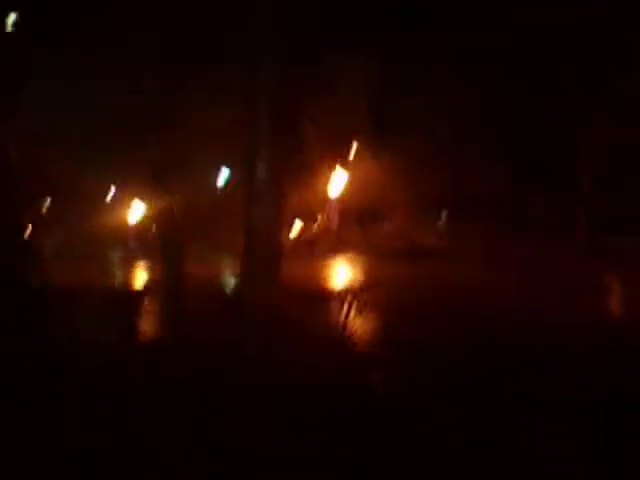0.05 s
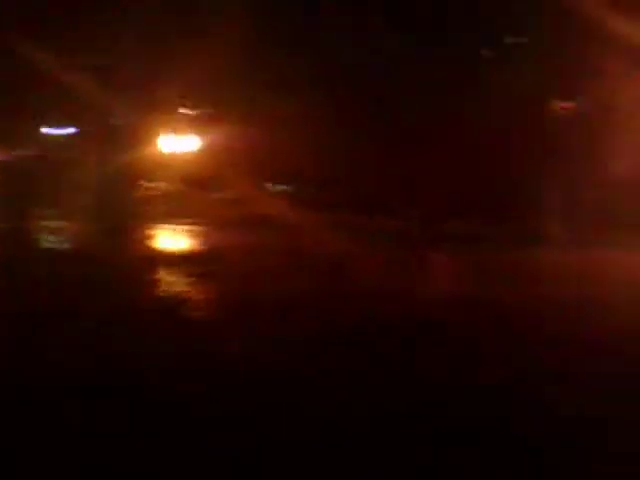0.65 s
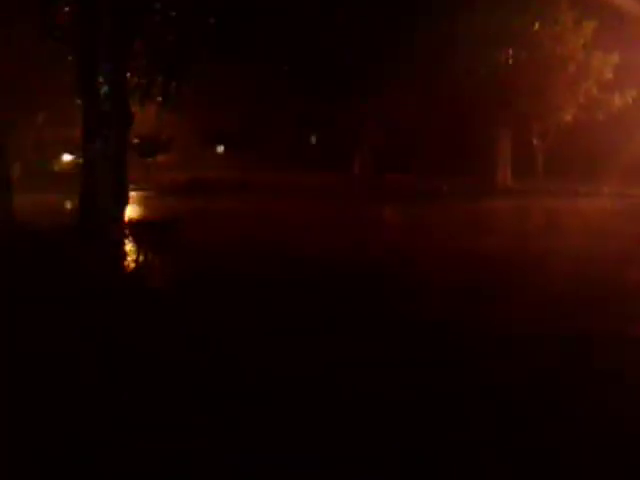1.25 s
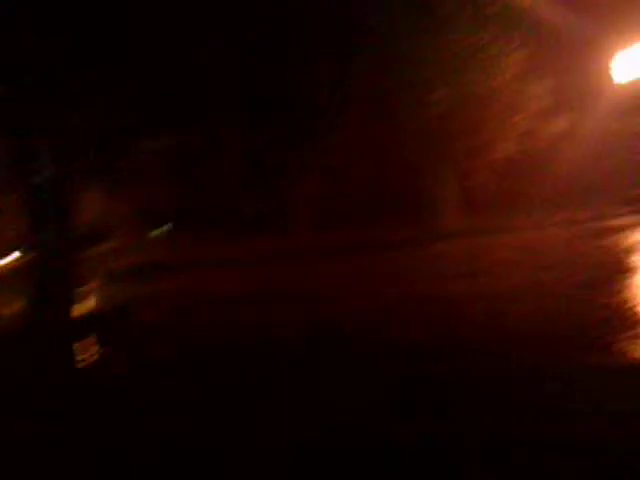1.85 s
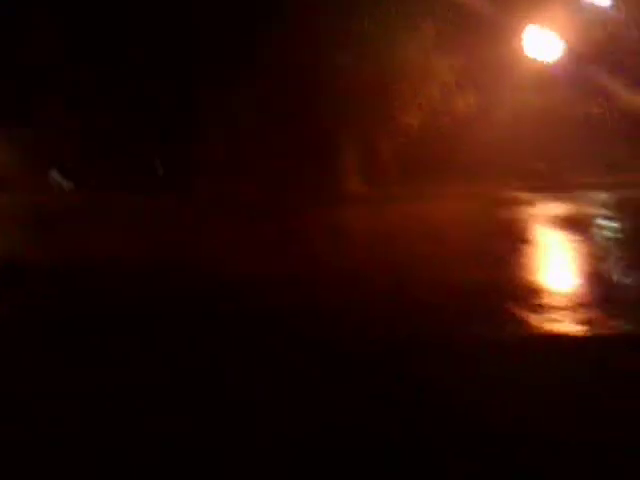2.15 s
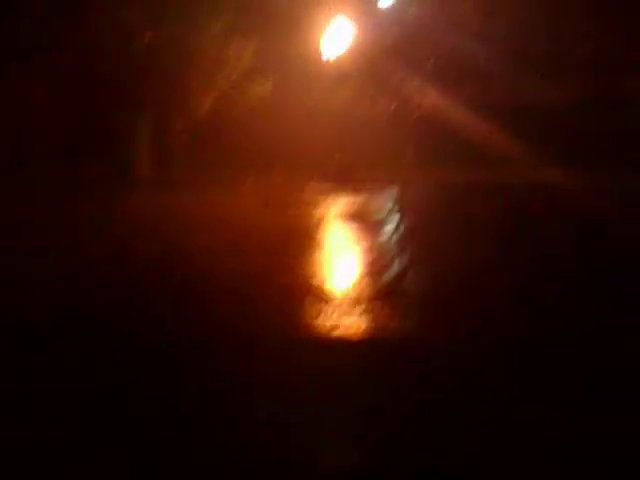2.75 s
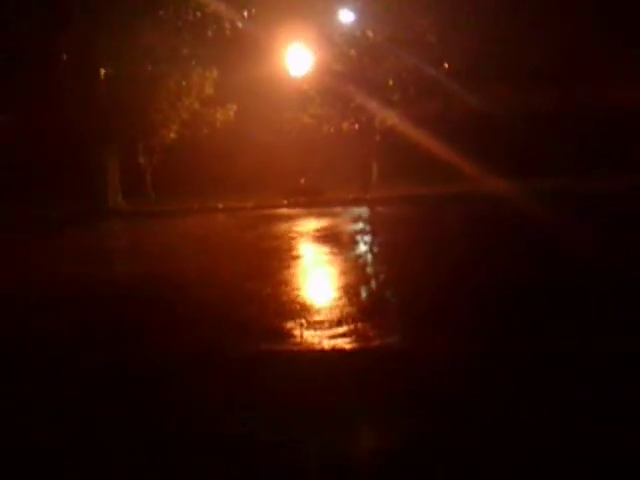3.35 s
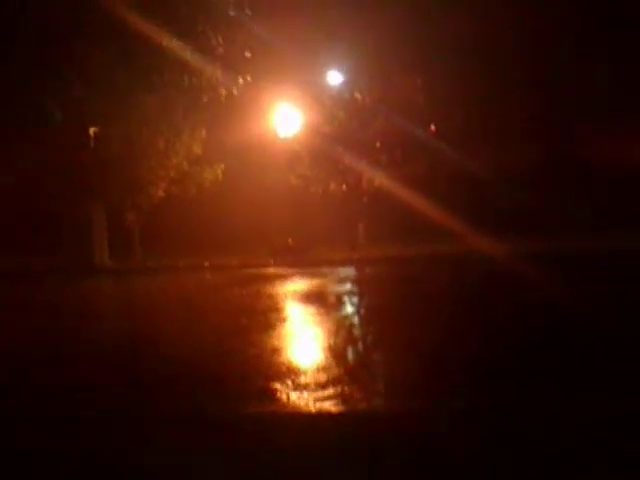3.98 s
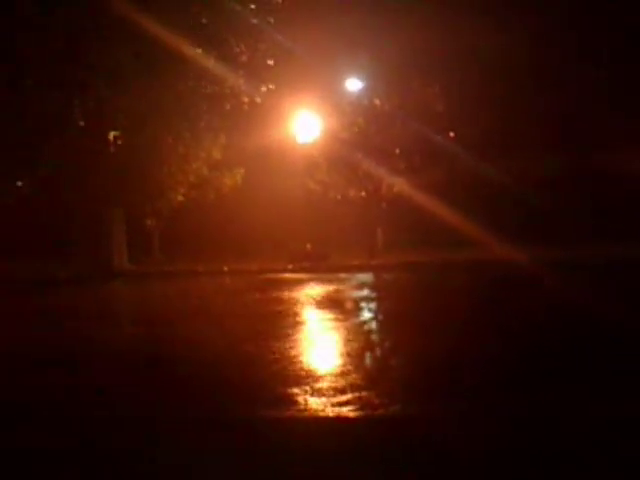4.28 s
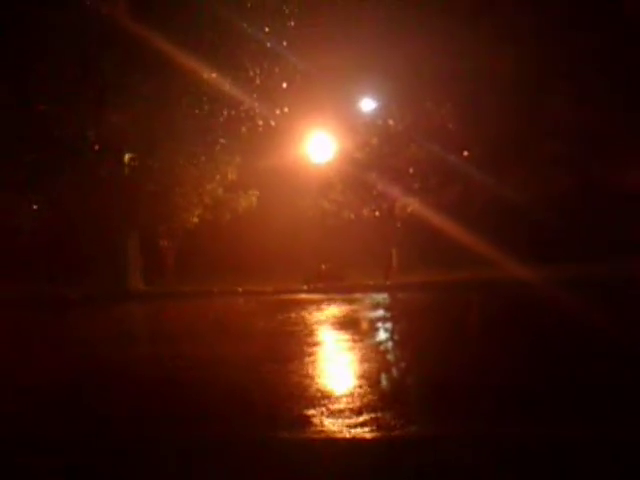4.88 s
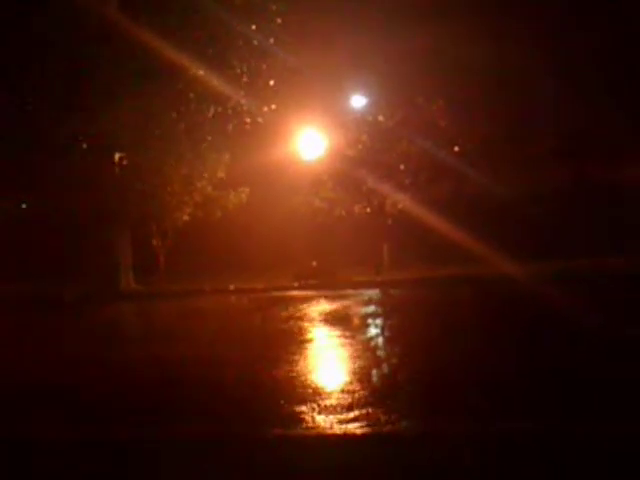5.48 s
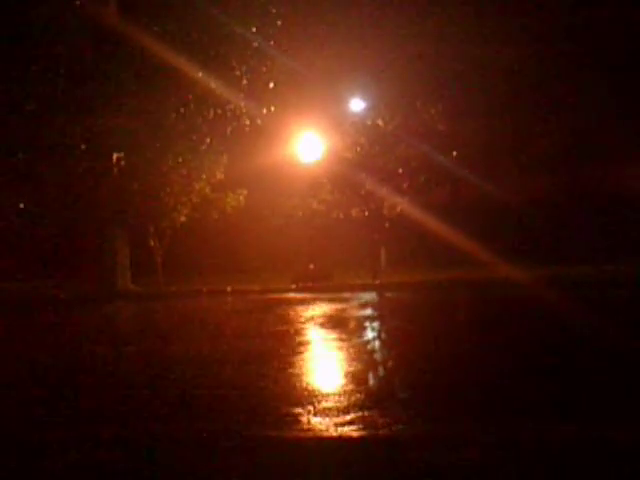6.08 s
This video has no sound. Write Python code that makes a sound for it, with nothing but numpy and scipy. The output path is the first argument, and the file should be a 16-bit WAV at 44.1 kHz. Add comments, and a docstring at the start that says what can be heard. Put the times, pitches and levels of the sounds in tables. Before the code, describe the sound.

A car drives along a wet street in the rain, heard from one sheltered spot for about six seconds. In the first 0.3 seconds the engine rises briefly and drops with a change up in gear. It then gains speed very slowly, its low tones swelling one after another and blending with a steady road rumble, rolling like low thunder. The tyres roar and throw up a soft hiss of spray, growing louder around 3.5 seconds and again near 6 seconds, over a very faint, thin whine. Fine rain patters lightly throughout, and single drops tick irregularly on surfaces close by, most clearly at about 2.3, 2.8, 4.1 and 5.7 seconds. A deep, dull thud comes at about 4.2 seconds and a softer one near 4.9 seconds. The drive continues to the end.

```python
"""On a wet street at night, a car drives through the rain. Just after a change up in gear,
the engine slowly gains speed. Its tones boom one after another and, with the rumble of
the road, roll like low thunder. The tyres roar and throw up hissing spray, louder as
the drive goes on, over a faint whine. Raindrops tick on surfaces close by."""
import sys
import numpy as np
from scipy import signal
from scipy.fft import rfft, irfft, next_fast_len
from scipy.io import wavfile
from scipy.ndimage import uniform_filter1d, map_coordinates

SR = 44100
rng = np.random.default_rng(int(sys.argv[2]) if len(sys.argv) > 2 else 0)


def int16_out(signal):
    """Quantize to a 16-bit WAV file."""
    q = np.round(np.clip(np.atleast_2d(signal).T, -1, 1) * 32767)
    wavfile.write(sys.argv[1], SR, q.astype(np.int16))


N = 274704


def amp(db):
    """Turn decibels into a number to multiply by."""
    return 10 ** (np.asarray(db) / 20)


def unit(x):
    """Scale a sound to an average power of 1."""
    return x / np.sqrt(np.mean(x ** 2) + 1e-20)


def curve(rows):
    """Join (seconds, value) points with straight lines, one value per sample."""
    return np.interp(np.arange(N) / SR, *np.transpose(rows))


def wobble(rate):
    """A smooth random curve through `rate` points a second."""
    points = rng.standard_normal(int(N * rate / SR) + 4)
    coarse = np.arange(0, N, 64)
    return np.interp(np.arange(N), coarse, map_coordinates(points, [coarse * rate / SR]))


def filtered(x, response):
    """Multiply each frequency in a sound by response(hz)."""
    size = next_fast_len(N + SR // 2)
    return irfft(rfft(x, size) * response(np.fft.rfftfreq(size, 1 / SR)), size)[:N]


def noise(spectrum):
    """Noise of power 1, shaped by (Hz, dB) points."""
    points_hz, db = np.transpose(spectrum)
    white = rng.standard_normal(N)
    return unit(filtered(white, lambda hz: amp(np.interp(np.log(hz + 1), np.log(points_hz), db))))


def street_db(mean_db, growth):
    """A level around mean_db that gains `growth` dB for each dB the street noise gains."""
    # The street noise. Each row: time in seconds, level in dB (only its changes count).
    street = [(0, -52.8), (.3, -49), (1.2, -50), (1.6, -48), (3.1, -48.5), (3.7, -45.5), (4.4, -45),
              (5.65, -45), (5.95, -43.5), (6.23, -43.5)]
    level = curve(street)
    return mean_db + growth * (level - level.mean())


def engine(flutter_db=1.35, weak_flutter_db=3, drift_radians=0.73, boom_steepness=4.03):
    """The engine hums in orders: tones at whole multiples of its shaft's turning speed."""
    # How fast the engine fires. Each row: time in seconds, firings per second.
    firing_rates = [(0, 52), (.13, 55.5), (.25, 49.9), (.8, 50.35), (1.25, 51.1), (2, 51.85), (5.7, 55.8),
                    (5.95, 56.6), (6.23, 57)]
    # Strong orders boom near certain speeds. Each row: order, firings per second at the peak,
    # half width in firings per second, level in dB.
    booms = [(2, 51.95, 0.52, -32.5), (2, 56.3, 2.37, -30), (3, 52.6, 0.47, -30.5), (3, 54.1, .8, -33.5),
             (4, 50.5, 0.44, -27.5), (4, 52.25, 0.8, -30.5), (4, 54, 0.63, -36.5), (4, 56.8, .8, -41.5),
             (6, 50.6, .4, -35), (6, 51.55, .33, -29), (6, 52.3, 0.51, -36.5), (6, 54.6, 1.7, -35.5),
             (8, 49.85, .3, -32), (8, 51.4, 1.16, -41.5), (8, 53.0, .27, -35.5), (8, 54.25, .45, -37.5),
             (10, 51.0, 0.37, -44)]
    # Uneven firing adds weak orders that waver more. Each entry: an order.
    weak_orders = [1, 5, 7, 9]
    # Each entry: the level in dB of the matching weak order.
    weak_levels = [-50.5, -50.5, -54.5, -52.5]
    firing = curve(firing_rates)
    load_db = curve([(0.16, -4.5), (0.28, 0)])  # quieter until the new gear takes the load
    shaft_angle = 2 * np.pi * np.cumsum(firing / 2) / SR  # two firings a turn

    def tone(order, drift=0):
        return np.sqrt(2) * np.sin(order * shaft_angle + rng.uniform(0, 2 * np.pi) + drift)

    hum, power = np.zeros(N), {}
    for order, peak_rate, width, db in booms:
        distance = np.abs((firing - peak_rate) / width)
        boom = amp(db) ** 2 / (1 + distance ** boom_steepness)
        power[order] = power.get(order, 0) + boom
    for order in power:
        hum += np.sqrt(power[order]) * amp(flutter_db * wobble(9)) * tone(order)
    for order, db in zip(weak_orders, weak_levels):
        hum += amp(db + weak_flutter_db * wobble(3)) * tone(order, drift_radians * wobble(8.3))
    return amp(load_db) * hum


def deep_rumble(level_db=-44.5, spread_db=4.5, thud_half_s=0.05):
    """A deep, uneven low rumble with two louder low thuds."""
    # The low thuds. Each row: time of the peak in seconds, level in dB.
    thuds = [(4.17, -32), (4.87, -40)]
    # The deep rumble and its thuds. Each row: frequency in Hz, relative level in dB.
    deep_spectrum = [(5, -15), (14, -4.5), (27, -2.5), (36, -4.5), (48, -25), (200, -120)]
    t = np.arange(N) / SR
    uneven_gain = amp(level_db + spread_db * wobble(2.6))
    thud_gain = sum(amp(db) * np.exp(-((t - peak_s) / thud_half_s) ** 2) for peak_s, db in thuds)
    return (uneven_gain + thud_gain) * noise(deep_spectrum)


def road():
    """The rough street makes a low rumble."""
    # The rumble's low resonances. Each row: frequency in Hz, relative level in dB.
    rumble_spectrum = [(25, -28), (42, -15), (54, -4.5), (70, 0.5), (94, 4.5), (108, -14), (130, -11),
                       (165, -5.5), (205, -8.5), (255, -9.5), (295, -22), (600, -53), (1500, -120)]
    rumble = noise(rumble_spectrum)
    swell = np.sqrt(np.abs(uniform_filter1d(rumble ** 2, size=SR // 5)) + 1e-6)
    steady_rumble = rumble / swell  # even asphalt keeps the rumble steady
    return amp(street_db(-34.5, growth=0.42)) * steady_rumble


def tyres(roar_wobble_db=0.5, hiss_wobble_db=0.57):
    """The tread roars, drones and throws up hissing spray, all growing with the street noise."""
    # The tread's roar. Each row: frequency in Hz, relative level in dB.
    roar_spectrum = [(120, -39.5), (230, -2), (310, -2.5), (420, 1), (560, -2), (750, -6.5), (1000, -12),
                     (1350, -13.5), (1700, -21), (2500, -28.5), (4000, -35.5), (9000, -68.5)]
    # The tyres' low drone near 300 Hz. Each row: frequency in Hz, relative level in dB.
    drone_spectrum = [(200, -40.5), (290, 1.5), (345, 1), (420, -12), (600, -10), (1200, -54)]
    # The spray's hiss. Each row: frequency in Hz, relative level in dB.
    hiss_spectrum = [(500, -29.5), (1500, 3), (2500, 2.5), (4200, -1), (5800, -1), (7500, -1.5), (9000, -5),
                     (10000, -7.5), (10800, -17), (11500, -24.5), (12200, -45.5)]
    grit_db = roar_wobble_db * wobble(14)
    roar = amp(street_db(-47.5, growth=0.84) + grit_db) * noise(roar_spectrum)
    drone = amp(street_db(-54, growth=1.7) + grit_db) * noise(drone_spectrum)
    spray = amp(street_db(-62, growth=0.96) + hiss_wobble_db * wobble(20)) * noise(hiss_spectrum)
    return roar + drone + spray


def whine():
    """A faint, thin tone that wavers slightly."""
    # The whine's two values: pitch in Hz, level in dB.
    thin_tone = (2717, -83)
    hz, db = thin_tone
    return amp(db) * np.sqrt(2) * np.sin(2 * np.pi * hz * np.arange(N) / SR + wobble(25))


def fine_rain(spread_db=3, centre_hz=7200, ring_cycles=9, count=2200):
    """Fine rain lands close by in tiny, fast-fading pings that grow louder with the spray."""
    t = np.arange(SR // 100) / SR
    starts = rng.integers(0, N, (count, 1))
    hz = np.clip(centre_hz * np.exp(0.37 * rng.standard_normal((count, 1))), 1500, 11000)
    size = amp(spread_db * np.minimum(rng.exponential(1, (count, 1)), 4))
    size *= np.sqrt(hz / centre_hz)  # long, low pings are softer
    pings = size * np.sin(2 * np.pi * hz * t) * amp(-60 * t * hz / ring_cycles)
    positions = starts + np.arange(len(t))
    shower = np.bincount(positions.ravel(), pings.ravel())[:N]  # add each ping at its place
    return amp(street_db(-71, growth=0.96)) * unit(shower)


def small_drops(level_db=-52, spread_db=1, centre_hz=7500, scatter=0.23, count=18):
    """Small drops fall at random. Each row: start in seconds, level in dB, pitch in Hz."""
    starts = rng.uniform(0, N / SR, count)
    softness, pitch = rng.standard_normal((count, 2)).T
    hz = np.clip(centre_hz * np.exp(scatter * pitch), 2000, 9500)
    return list(zip(starts, level_db - spread_db * softness, hz))


def drops(click_cycles=7, splash_cycles=71, splash_db=-5, band_width=0.21, rise_s=0.00005):
    """Each drop clicks as it lands and splashes around the same pitch, then dies away."""
    # Large drops close by. Each row: start in seconds, level in dB, pitch in Hz.
    large_drops = [(1.372, -49, 2430), (1.387, -48, 2450), (1.487, -46.5, 8800), (2.334, -37, 5860),
                   (2.334, -40.5, 1500), (2.346, -45, 6200), (2.790, -43.5, 8200), (3.096, -46, 4870),
                   (3.905, -48, 9200), (4.098, -39.5, 2200), (4.516, -43, 4750), (4.594, -43, 9200),
                   (5.426, -48, 7400), (5.698, -41, 8000), (6.037, -45.5, 2270)]
    ticks = np.zeros(N + SR)
    t = np.arange(SR // 10) / SR
    grid_hz = np.fft.rfftfreq(len(t), 1 / SR)
    for start_s, db, hz in large_drops + small_drops():
        rise = 1 - np.exp(-t / rise_s)
        click = np.sin(2 * np.pi * hz * t) * amp(-60 * t * hz / click_cycles) * rise
        band = np.exp(-0.5 * (np.log((grid_hz + 1) / hz) / band_width) ** 2)
        fizz = unit(irfft(rfft(rng.standard_normal(len(t))) * band, len(t)))
        splash = fizz * amp(splash_db - 60 * t * hz / splash_cycles)
        ticks[round(start_s * SR):][:len(t)] += amp(db) * (click + splash)
    return ticks[:N]


def close_echo(x, echo_db=-7, decay_s=0.1):
    """Nearby surfaces add a very short echo."""
    t = np.arange(SR // 8) / SR
    tail = rng.standard_normal(len(t)) * amp(-60 * t / decay_s) * (t > 0.002)
    return x + amp(echo_db) * signal.fftconvolve(x, tail / np.linalg.norm(tail))[:N]


def scene():
    """The car and the rain, heard together from one sheltered spot."""
    rain = close_echo(fine_rain() + drops())
    rain = filtered(rain, lambda hz: 1 / np.sqrt(1 + (hz / 10400) ** 36))  # trim the highest treble
    return (engine() + deep_rumble() + road() + tyres() + whine() + rain)[None]


def record(dry, fade_s=0.008, top_hz=12200):
    """Fade both ends briefly and keep nothing above top_hz."""
    t = np.arange(N) / SR
    from_edge_s = np.minimum(t, t[-1] - t)
    fade = np.sin(np.pi / 2 * np.clip(from_edge_s / fade_s, 0, 1)) ** 2
    return filtered(dry[0] * fade, lambda hz: hz < top_hz)[None]


dry = scene()
out = record(dry)
int16_out(out)
```